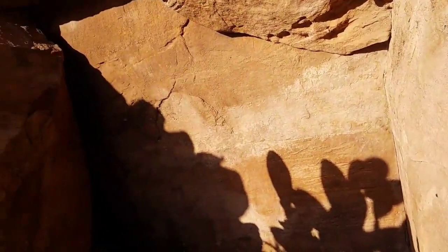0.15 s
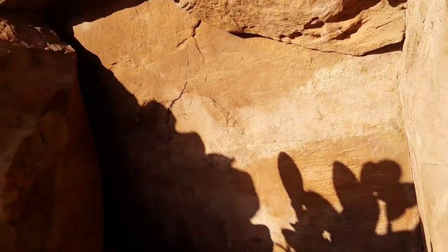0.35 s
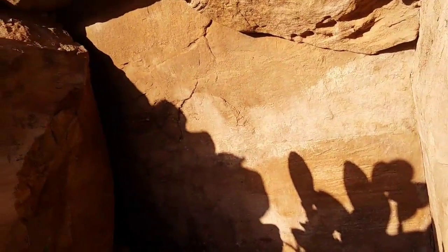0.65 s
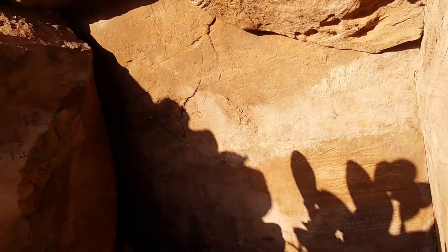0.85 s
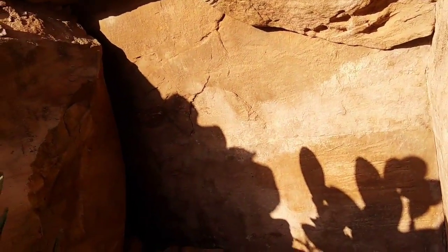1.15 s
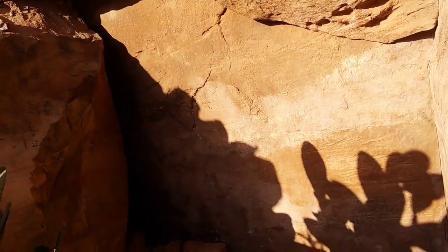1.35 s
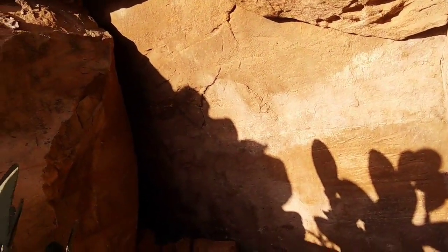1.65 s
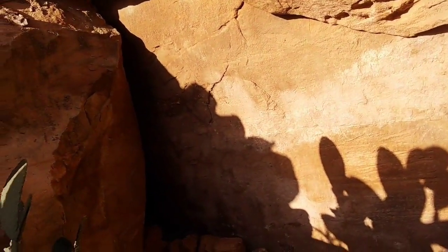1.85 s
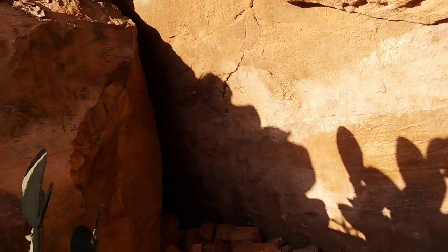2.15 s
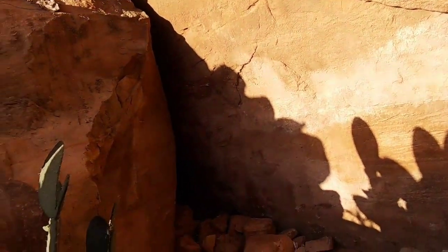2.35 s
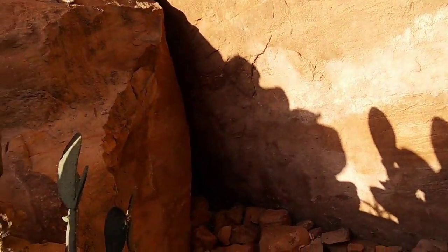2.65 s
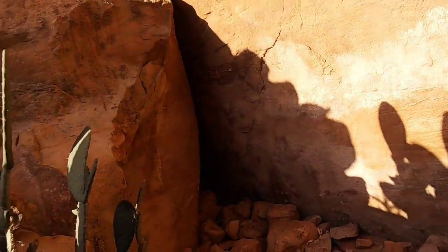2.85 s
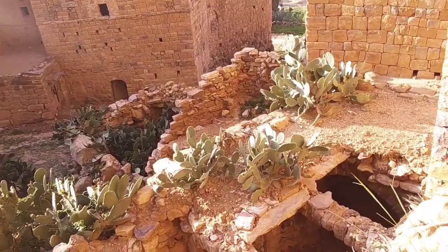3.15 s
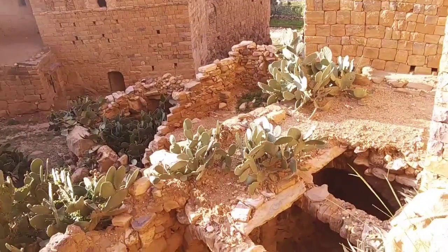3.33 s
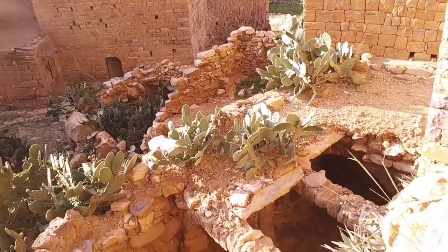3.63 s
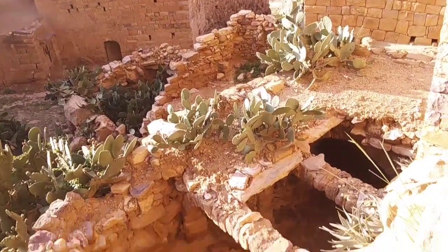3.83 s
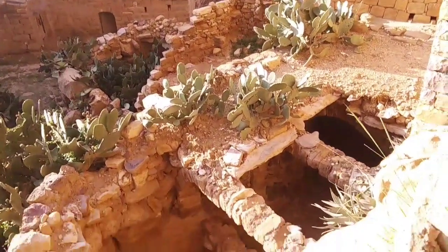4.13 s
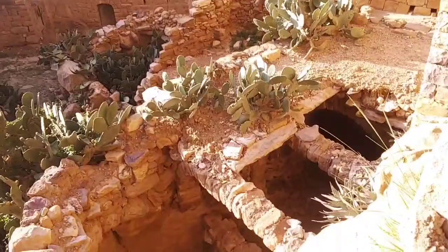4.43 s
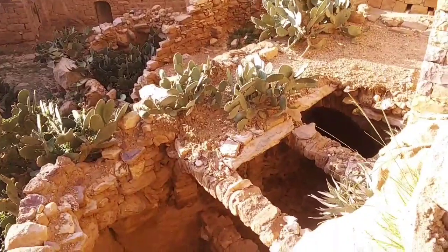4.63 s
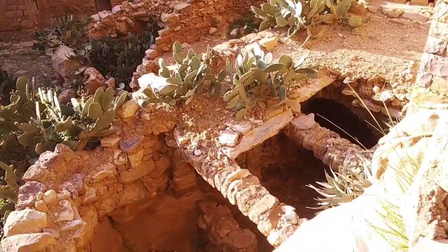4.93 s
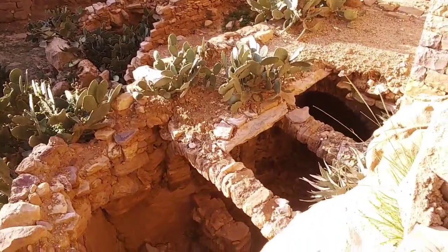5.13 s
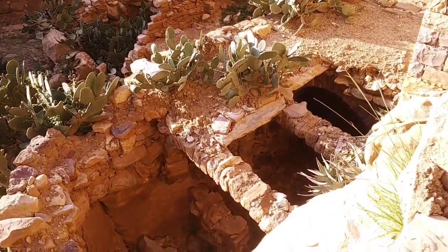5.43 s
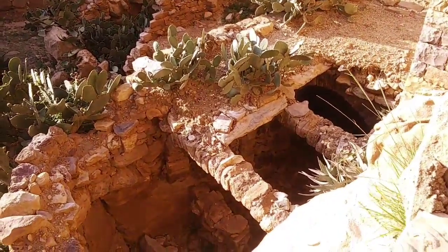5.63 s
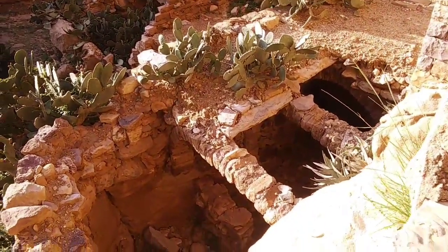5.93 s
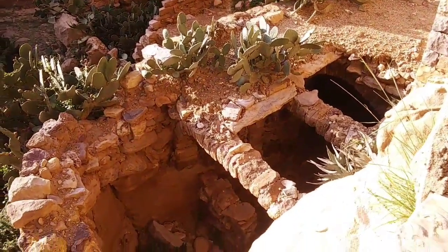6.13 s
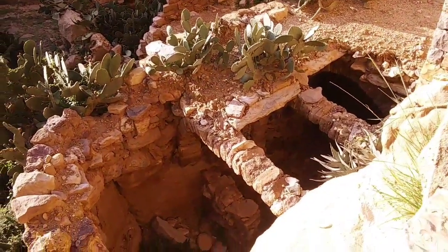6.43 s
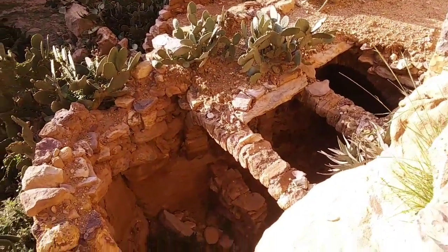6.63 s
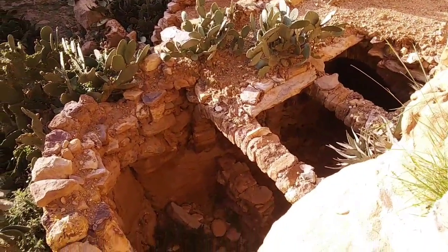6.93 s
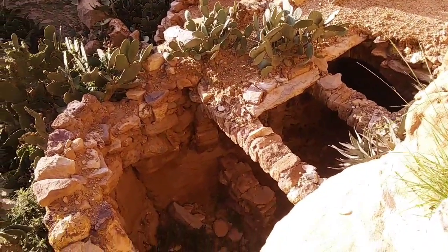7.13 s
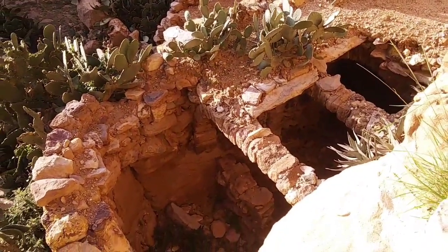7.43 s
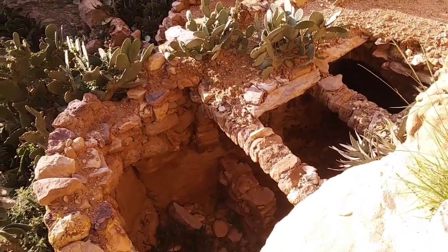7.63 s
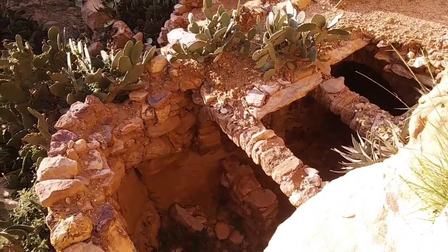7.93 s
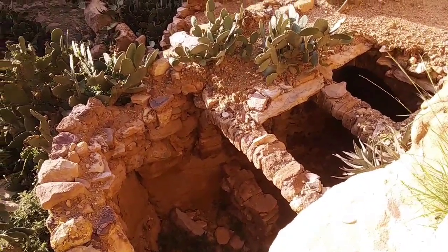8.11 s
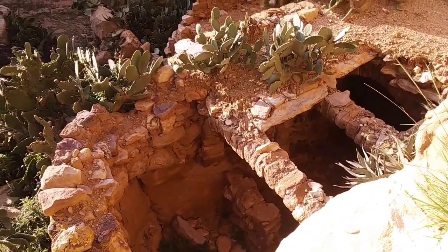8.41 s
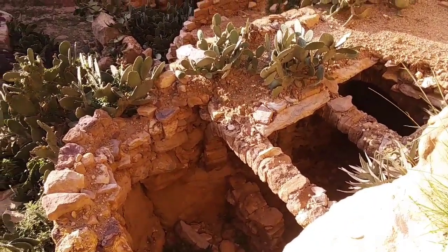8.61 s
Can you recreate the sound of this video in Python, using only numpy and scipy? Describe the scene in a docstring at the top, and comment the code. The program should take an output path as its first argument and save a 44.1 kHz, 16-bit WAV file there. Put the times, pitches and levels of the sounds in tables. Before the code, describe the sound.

A hand shifts its grip on a small plastic-bodied device right at the microphone. Faint ticks and rubbing come first, then isolated hard knocks, then a crowded run of clacks and rattles. A near-quiet lull follows, before more ticks, rough gritty scuffs and a final cluster of knocks. Dry, echo-free, thin in bass, outdoors among sunny stone ruins, with very faint steady hiss.

```python
"""Very close, dry ticks and knocks, probably the grip shifting on the plastic shell of a small hand-held camera.
Outdoors on loose stone, the hand right at the microphone: each tick is a damped low swing, a bright snap and a rattle.
Gritty rubbing lies between the clusters: random grains coloured by the shell and by its surface.
Two ticks carry a bare click, a tiny metal ring gives three faint chinks as decaying sines,
and a quiet hiss of distant air and microphone, shaped from noise, runs underneath."""
import sys
import numpy as np
from scipy import signal
from scipy.fft import rfft, irfft
from scipy.io import wavfile
from scipy.ndimage import uniform_filter1d

SR = 44100
rng = np.random.default_rng(int(sys.argv[2]) if len(sys.argv) > 2 else 0)


def generate_wav(signal):
    """Clip the signal to [-1, 1] and save it as 16-bit WAV at the path in sys.argv[1]."""
    frames = np.transpose(np.atleast_2d(signal))
    scaled = np.clip(frames, -1, 1) * 32767
    pcm = np.round(scaled).astype(np.int16)
    wavfile.write(sys.argv[1], SR, pcm)


N = 386757

# Ticks of the shell: [t/s, peak level of low part/dB, nominal pitch f/Hz, snap level re low part/dB,
# rattle t60/s, rattle level re first slip/dB]
SHELL_TICKS = [(0.0005, -31.5, 610, -13, 0.035, 4), (0.0499, -25, 583, -25, 0.016, -4),
               (0.0846, -27, 586, -26, 0.018, -7), (0.1109, -24.5, 550, -7.5, 0.032, -14),
               (0.186, -27, 620, -12.5, 0.042, -4.5), (0.206, -36.5, 445, -8, 0.02, 3),
               (0.2223, -30.5, 616, -15, 0.033, -4), (0.3246, -23.5, 636, -21, 0.043, -8),
               (0.34, -27, 400, -14, 0.011, 6), (0.355, -33, 286, -18, 0.036, -8),
               (0.522, -38.5, 543, -24, 0.028, -7), (0.6069, -20.5, 766, -17, 0.021, -11.5),
               (0.777, -41.5, 1000, -32, 0.018, -12), (1.1611, -46, 388, -20, 0.069, 0),
               (1.192, -41.5, 730, -17, 0.018, 9), (1.32, -8.5, 587, -19.5, 0.013, -1),
               (1.3302, -47, 712, -11, 0.089, -3), (2.1251, -28, 670, -32, 0.02, -6),
               (2.1386, -1, 925, -6.5, 0.024, -26), (2.1595, -16, 780, -21, 0.013, 4),
               (2.1805, -12, 540, -22, 0.019, -1.5), (2.198, -15, 620, -18, 0.019, 1.5),
               (2.214, -17, 735, -12.5, 0.019, -8), (2.2753, -8.5, 656, -22.5, 0.033, -4.5),
               (2.2818, -13, 474, -19, 0.016, -3.5), (2.6647, -49.5, 1060, -13, 0.016, -14),
               (2.837, -47, 935, -19, 0.018, 1), (3.0776, -21, 458, -32, 0.2, 4),
               (3.0845, -25, 740, -14.5, 0.033, 2), (3.09, -1.5, 680, -24, 0.018, -17),
               (3.1028, -22, 756, -12, 0.067, 3), (3.112, -15, 740, -15.5, 0.047, -0.5),
               (3.1245, -11.5, 835, -13.5, 0.037, 1.5), (3.1377, -18, 634, -14, 0.036, 6.5),
               (3.1505, -35, 750, -18, 0.034, 5), (3.1922, -14, 400, -18.5, 0.023, -10),
               (3.235, -20, 422, -18, 0.037, 1), (3.2416, -6, 775, -15, 0.014, -5),
               (3.275, -12, 750, -16, 0.026, 5), (3.3554, -24, 1050, -36, 0.031, -11),
               (3.371, -17.5, 593, -10, 0.019, -5), (3.4079, -35.5, 596, -17, 0.043, 5),
               (3.4917, -0.5, 1060, -16, 0.032, -14.5), (3.4975, -22, 920, -32, 0.017, 1),
               (3.5823, -9.5, 630, -20, 0.014, 1.5), (3.5928, -5, 954, -18, 0.024, 1),
               (3.733, -6, 570, -22, 0.016, -7.5), (3.9197, -27.5, 825, -14, 0.038, 15),
               (3.926, -8, 595, -17, 0.012, 1), (3.9834, -11, 555, -11, 0.05, 7),
               (3.9877, -7.5, 950, -21, 0.016, -0.5), (4.0076, -16.5, 820, -16.5, 0.025, 9),
               (4.0361, -7, 714, -19.5, 0.011, 10), (4.0665, -30, 664, -10, 0.018, 0),
               (4.144, -3, 1760, -19.5, 0.013, 2.5), (4.1733, -43, 844, -18, 0.056, 5),
               (4.2567, -3.5, 850, -11, 0.018, -4), (4.2737, -19, 616, -17.5, 0.024, -2.5),
               (4.512, -3, 660, -12.5, 0.015, -6), (4.546, -8.5, 880, -21.5, 0.02, 10.5),
               (4.5662, -11.5, 1230, -13, 0.036, -13), (4.5994, -3.5, 960, -16.5, 0.018, 2),
               (4.6177, -25.5, 710, -14, 0.029, -3), (4.6513, -26, 1430, -32, 0.073, -10),
               (4.6869, -41.5, 710, -13, 0.023, -4), (4.8191, -39, 760, -36, 0.13, 0),
               (4.8315, -31.5, 1280, -25, 0.019, -15), (4.903, -40.5, 625, -29, 0.076, 3.5),
               (4.917, -30, 586, -17.5, 0.014, 15), (5.048, -49, 648, -18, 0.029, 3),
               (5.163, -37, 640, -7, 0.021, -2), (5.305, -45, 593, -32, 0.017, -5),
               (5.3447, -36, 1560, -24, 0.027, -16), (5.431, -49, 1040, -22, 0.045, -2.5),
               (5.498, -28.5, 505, -15, 0.034, 6), (5.5042, -41, 470.4, -25.5, 0.072, 8),
               (6.5215, -43, 540, -23, 0.02, -15.5), (6.5288, -49.5, 508, -14, 0.038, 0),
               (6.7055, -34.5, 573, -27, 0.029, -14.5), (6.7192, -47, 1180, -16.5, 0.024, -7.5),
               (6.7789, -41, 514, -38, 0.02, -24), (6.8083, -21.5, 504, -21.5, 0.038, -5),
               (6.815, -37.5, 653, -11, 0.043, 7), (6.993, -20.5, 966, -15, 0.0097, 0),
               (7.0633, -14.5, 870, -23, 0.024, -14.5), (7.141, -22, 716, -17, 0.029, -1.5),
               (7.152, -8.5, 970, -13.5, 0.033, -5.5), (7.2363, -18.5, 480, -18, 0.045, 17),
               (7.247, -14.5, 990, -6.5, 0.02, -20), (7.26, -24, 704, -16, 0.025, -3),
               (7.4691, -45, 707, -15, 0.049, -6), (7.559, -45.5, 1145, 1.5, 0.093, -2.5),
               (7.7177, -18, 780, -27, 0.11, -10.5), (7.731, -21, 950, -7.5, 0.17, -15),
               (7.786, -29.5, 770, -3, 0.073, 2), (7.8664, -31, 756, -24, 0.056, -3.5),
               (7.9826, -37.5, 1110, 1, 0.066, 0), (8.043, -34, 765, -2, 0.033, 23),
               (8.061, -10, 950, -23, 0.031, 4), (8.075, -33.5, 1840, 11.5, 0.053, 0),
               (8.125, -31.5, 750, -3, 0.028, 14), (8.223, -30, 2420, -20, 0.027, -12),
               (8.2618, -40, 2060, -18, 0.025, -16), (8.2836, -22.5, 693, -17, 0.012, 5.5),
               (8.33, -35.5, 1810, -21, 0.026, -20), (8.3838, -38.5, 1810, -1.5, 0.061, -13.5),
               (8.4797, -32, 2290, -3, 0.032, -6), (8.5052, -29, 2400, -4, 0.028, -11),
               (8.56, -1.5, 780, -15, 0.02, -6.5), (8.657, -11, 570, -26, 0.033, -5),
               (8.6852, -2.5, 695, -21, 0.03, -5.5), (8.7046, -10, 844, -14.5, 0.043, 7),
               (8.7403, -6, 665, -19.5, 0.028, -3.5), (8.75, -18, 910, -11, 0.046, -1.5),
               (8.7617, -29, 1060, -15, 0.027, -9)]
# Colour of the snap: [f/Hz, relative level/dB]
SNAP_SPECTRUM = [(900, -33), (1800, 9.5), (3000, 6.5), (5000, -3.5), (8000, -14.5), (12000, -20.5),
                 (16000, -32)]
# Sliding skin, on and off: [t/s, dull level/dB, gritty level/dB]
SKIN_SLIDE = [(0, -65, -62), (.14, -72, -68.5), (.45, -62, -66.5), (.63, -60, -68.5), (.76, -78, -81),
              (2.05, -90.5, -90.5), (2.24, -67, -70), (2.5, -92, -94), (3.0, -77.5, -89.5),
              (3.17, -65, -67), (3.4, -62, -64.5), (3.47, -72.5, -69.5), (3.68, -63.5, -66),
              (3.76, -59, -58.5), (3.851, -66.5, -66.5), (4.3, -65, -65), (4.47, -73, -77),
              (4.64, -54, -58.5), (4.77, -68.5, -79), (4.95, -60.5, -61.5), (5.2, -73.5, -71.5),
              (5.6, -88, -80.5), (6.6, -81.5, -88.5), (6.8, -68.5, -77), (7.15, -66, -71),
              (7.5, -72.5, -72), (7.57, -60, -58), (7.74, -52.5, -50), (7.99, -59, -54.5),
              (8.026, -76, -67), (8.06, -51, -50.5), (8.15, -58.5, -52), (8.19, -67.5, -65.5),
              (8.36, -68.5, -63.5), (8.42, -73, -69), (8.77, -70, -62)]
# Short scuffs on top of the slide: [start t/s, length t/s, dull level/dB, gritty level/dB, fizzy level/dB]
SHORT_SCUFFS = [(3.88, 0.12, -59, -52, -67), (3.939, 0.16, -48, -50, -62), (4.674, 0.083, -57, -68, -77),
                (4.952, .06, -71, -59.5, -68), (7.724, 0.044, -49, -49, -62.5),
                (7.751, 0.057, -39.5, -46, -70), (7.808, 0.066, -49, -44.5, -62),
                (7.951, 0.063, -58, -52, -62.5), (8.037, 0.051, -38.5, -46, -60),
                (8.209, 0.053, -62, -59, -85), (8.444, 0.098, -56, -52.5, -74),
                (8.565, 0.079, -60.5, -66, -76), (8.69, 0.071, -63, -57, -68), (8.742, .05, -37, -53, -66)]
# Colour of low grains through the shell: [f/Hz, relative level/dB]
DULL_SPECTRUM = [(120, -35.5), (300, -5), (700, -2.5), (1500, -3.5), (2500, -16), (5000, -53.5)]
# Colour of finer grit at the surface: [f/Hz, relative level/dB]
GRIT_SPECTRUM = [(900, -29.5), (1900, 0), (3000, 0.5), (3600, -8.5), (5600, -10), (7000, -24.5),
                 (9000, -51)]
# Colour of the fizz at the surface: [f/Hz, relative level/dB]
FIZZ_SPECTRUM = [(4000, -43.5), (7000, -3.5), (9700, 1), (15400, -11.5), (15600, -60)]
# Colour of distant air and microphone hiss: [f/Hz, relative level/dB]
HISS_SPECTRUM = [(30, -36.5), (120, -26), (200, -12), (330, -5), (700, -0.5), (1600, -4), (3300, -10.5),
                 (6000, -15), (15400, -16.5), (15600, -46.5)]
# Bare, needle-sharp clicks on top of two ticks: [t/s, level/dB]
SHARP_CRACKS = [(2.138, -22.5), (7.247, -11)]
# Light touches of the metal ring: [t/s, level/dB]
RING_CHINKS = [(4.69, -66), (4.715, -64), (4.819, -56.5)]
# Modes of the metal ring: [f/Hz, relative level/dB, t60/s]
RING_MODES = [(4960, 0, 0.072), (6130, -7, .08), (9625, -8, 0.11), (10900, -12, .07)]

SLIDE_FIZZ_DB = -15  # fizzy part of the slide, relative to its gritty part
RISE, FALL = 0.24, 0.37  # shares of a scuff spent pressing on and easing off
HISS_DB = -68.5  # rms before its swell
BASS_CUT_HZ, EDGE_HZ = 210, 16400  # lower and upper limits of the microphone channel
CEILING = 0.85  # level the soft overload approaches, full scale = 1


def gain_of(db):
    """Decibels to gain."""
    return 10 ** (np.asarray(db) / 20)


def evened(x):
    """Scales to an rms of one."""
    return x / np.sqrt(np.mean(x ** 2) + 1e-20)


def add(mix, s, sound):
    """Mixes a sound in at a time in seconds, cut off at the end of the mix."""
    part = mix[round(s * SR):][:len(sound)]
    part += sound[:len(part)]


def response(points, size=1024):
    """Causal (minimum-phase) impulse response of energy one with the given spectrum."""
    f, db = np.transpose(points)
    log_f = np.log(abs(np.fft.fftfreq(size, 1 / SR)) + 1)
    log_gain = np.log(gain_of(np.interp(log_f, np.log(f), db)))
    spectrum = np.exp(np.conj(signal.hilbert(log_gain)))
    taps = np.fft.ifft(spectrum).real[:size // 2]
    return taps / np.linalg.norm(taps)


def blow(hz, cycles=0.35, sag=0.73, settle=0.65, rise=0.31):
    """A heavily damped swing of the shell whose pitch sags towards settle * hz as it dies."""
    u = np.arange(400) / SR * hz * settle  # time in cycles of the settled pitch
    phase = u + sag * (1 - np.exp(-u / 1.07))
    onset = 1 - np.exp(-(u / rise) ** 2)
    swing = -np.sin(2 * np.pi * phase) * onset * np.exp(-u / cycles * 2)
    return swing / abs(swing).max()


def ticks(lead=0.004):
    """Each tick is one slip, with slips leading into it and a dying rattle after; all swing low, and the main
    slip and the higher rattle slips also snap bright."""
    out, t = np.zeros(N), np.arange(3000) / SR - lead
    snap = response(SNAP_SPECTRUM)
    slip = 1. * (np.arange(len(t)) == np.argmin(abs(t)))
    chance = rng.random((len(SHELL_TICKS), 4, len(t)))
    for (s, db, hz, snap_db, t60, rattle_db), (when, size, fuzz, spot) in zip(SHELL_TICKS, chance):
        # the grip gives way a little before it slips
        swell_db = np.where(t > 0, -60 * t / t60, -16 + 4000 * t)
        slips = (when < 2600 / SR) * (2 * size - 1)  # about 2600 per second
        rattle = slips * gain_of(rattle_db + swell_db) * (abs(t) > 0.0008)
        # the rattle wanders over the shell: some slips sound lower, some higher
        deep = rattle * (spot < 0.5)
        thin = (rattle - deep) * gain_of(-30 * abs(t) / t60)  # the brighter slips die sooner
        low = np.convolve(slip, blow(hz))
        low = low + np.convolve(deep, blow(np.sqrt(350 * hz)))
        low = low + np.convolve(thin, blow(1.765 * hz))
        # the snap frays: a clean edge, then the main slip and the higher rattle slips are smeared into a short
        # noisy scratch
        smear = np.exp(-np.arange(120) / SR / 0.00069)
        scratch = np.convolve(0.28 * slip + abs(thin), smear)[:len(t)] * (2 * fuzz - 1)
        bright = np.convolve(scratch - 0.8 * slip, snap)[:len(t)]
        both = low[:len(t)] / abs(low).max() + gain_of(snap_db) * bright / abs(bright).max()
        add(out, max(s - lead, 0), gain_of(db) * both)
    return out


def strokes():
    """Gain of the three parts of the rubbing: the slide, plus scuffs that press on, hold and ease off."""
    t = np.arange(N) / SR
    s, dull_db, grit_db = np.transpose(SKIN_SLIDE)
    parts_db = (dull_db, grit_db, grit_db + SLIDE_FIZZ_DB)
    power = gain_of([np.interp(t, s, db) for db in parts_db]) ** 2
    for start, length, *levels_db in SHORT_SCUFFS:
        u = (t - start) / length
        press = np.clip(np.minimum(u / RISE, (1 - u) / FALL), 0, 1)
        power = power + (gain_of(levels_db)[:, None] * press) ** 2
    return np.sqrt(power)


def grains(per_s, spread_db, lumpy_db):
    """Random clicks of uneven size that come in clumps of some milliseconds."""
    size = gain_of(spread_db * np.minimum(rng.exponential(1, N), 5)) * rng.standard_normal(N)
    clumps = evened(uniform_filter1d(uniform_filter1d(rng.standard_normal(N), 400), 300))
    clicks = size * (rng.random(N) < per_s / SR)
    return evened(clicks * gain_of(lumpy_db * clumps))


def patchy(x, patchy_db):
    """Random patches of the spectrum swell and fade, as the rubbed spot moves."""
    z = signal.stft(x, nperseg=512)[2]
    noise = rng.standard_normal(z.shape)
    patches = evened(uniform_filter1d(uniform_filter1d(noise, 5, 0), 6, 1))  # over bins, then frames
    return signal.istft(z * gain_of(patchy_db * patches), nperseg=512)[1][:N]


def rubbing():
    """Stick and slip: dense low grains through the shell, finer grit and fizz at the surface."""
    dull, grit, fizz = strokes()
    low = signal.oaconvolve(dull * grains(4000, 2.2, 1.8), response(DULL_SPECTRUM))
    mid = signal.oaconvolve(grit * grains(5000, 3, 2.2), response(GRIT_SPECTRUM))
    top = signal.oaconvolve(fizz * grains(17000, 2.7, 0.6), response(FIZZ_SPECTRUM))
    return patchy((low + mid + top)[:N], 2.3)


def hiss():
    """Distant air and the hiss of the microphone: coloured noise, swelling a little."""
    f, db = np.transpose(HISS_SPECTRUM)
    log_f = np.log(np.fft.rfftfreq(N, 1 / SR) + 1)
    colour = gain_of(np.interp(log_f, np.log(f), db))
    noise = irfft(rfft(rng.standard_normal(N)) * colour, N)
    swell = evened(uniform_filter1d(uniform_filter1d(rng.standard_normal(N), 5000), 5000))
    return gain_of(HISS_DB + 0.6 * swell) * evened(noise)


def cracks():
    """Needle-sharp clicks, each a single negative sample."""
    out = np.zeros(N)
    for s, db in SHARP_CRACKS:
        add(out, s, -gain_of([db]))
    return out


def chinks():
    """A small metal ring touched lightly: decaying sine modes with a soft onset."""
    out, t = np.zeros(N), np.arange(6000) / SR
    ring = sum(gain_of(db - 60 * t / t60) * np.sin(2 * np.pi * hz * t) for hz, db, t60 in RING_MODES)
    onset = 1 - np.exp(-t / 0.003)
    for s, db in RING_CHINKS:
        add(out, s, gain_of(db) * ring * onset)
    return out


def scene():
    """All handling sounds reach one close microphone without any echo."""
    mix = ticks() + rubbing() + cracks() + chinks()
    return mix[None]


def record(dry):
    """Bass cut, soft overload on the hardest blows, added hiss, band limit."""
    bass_cut = signal.butter(3, BASS_CUT_HZ, "high", fs=SR, output="sos")
    thin = signal.sosfilt(bass_cut, dry)
    loud = CEILING * np.tanh(thin / CEILING) + hiss()
    band_limit = signal.firwin(511, EDGE_HZ, window=("kaiser", 9), fs=SR)
    return signal.oaconvolve(loud, band_limit[None], "same")


dry = scene()
out = record(dry)
generate_wav(out)
```